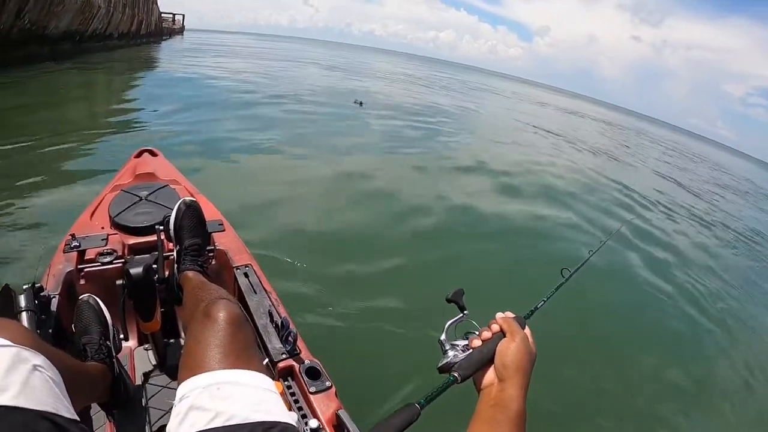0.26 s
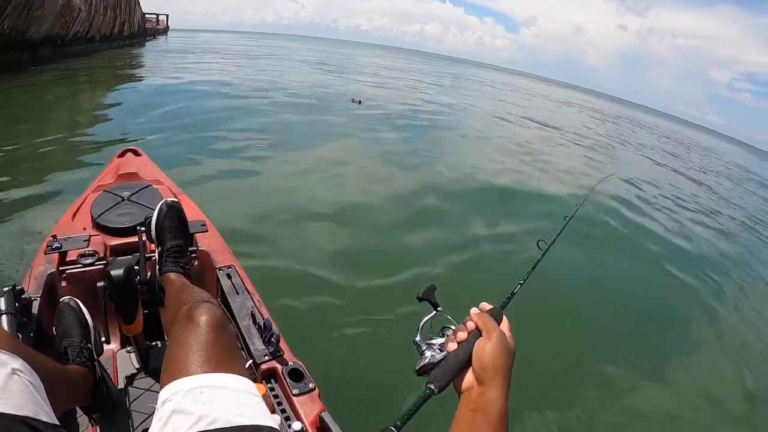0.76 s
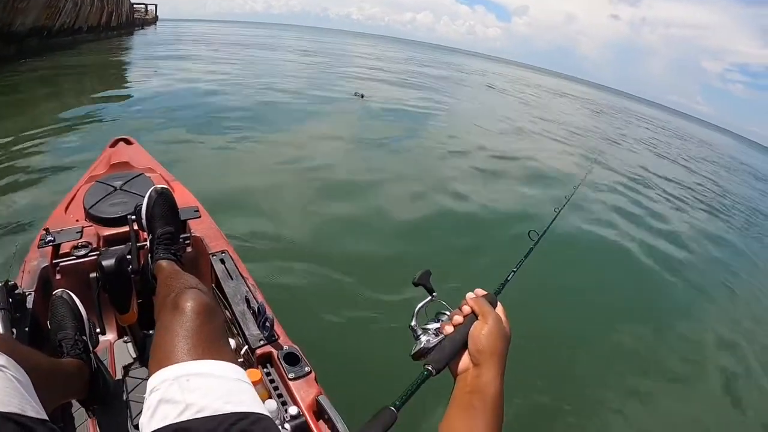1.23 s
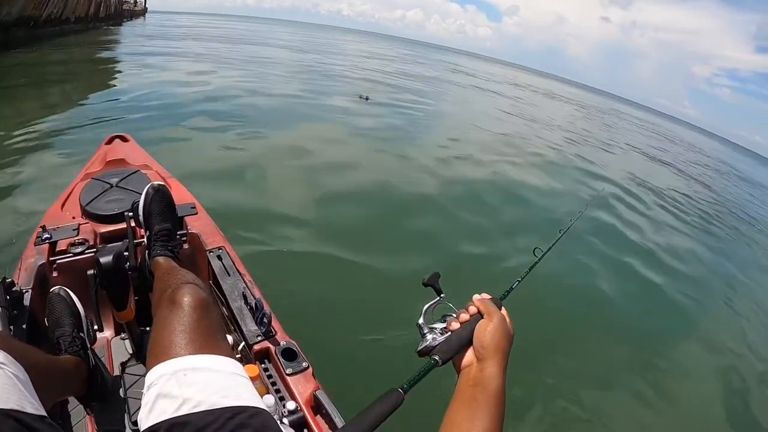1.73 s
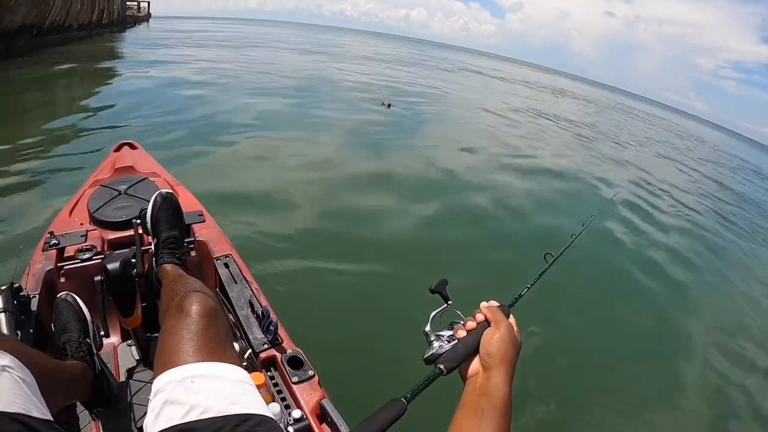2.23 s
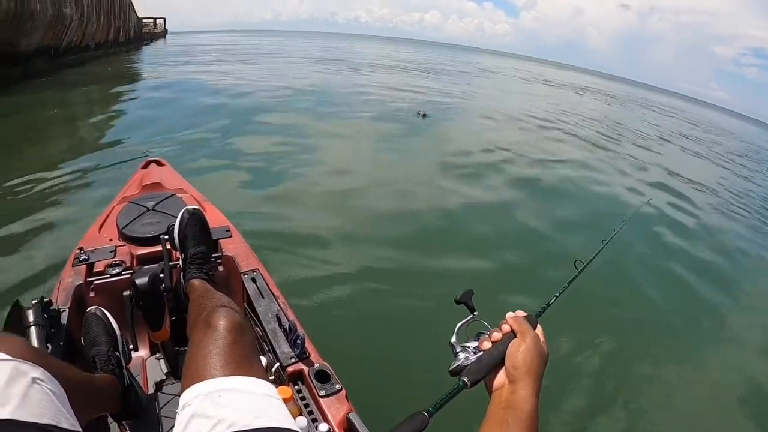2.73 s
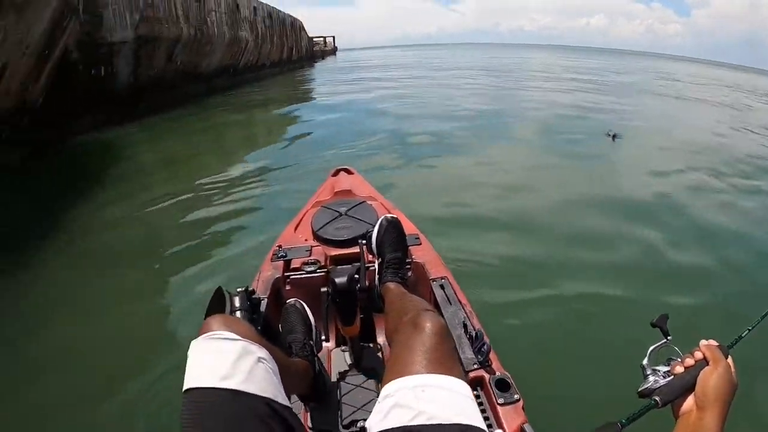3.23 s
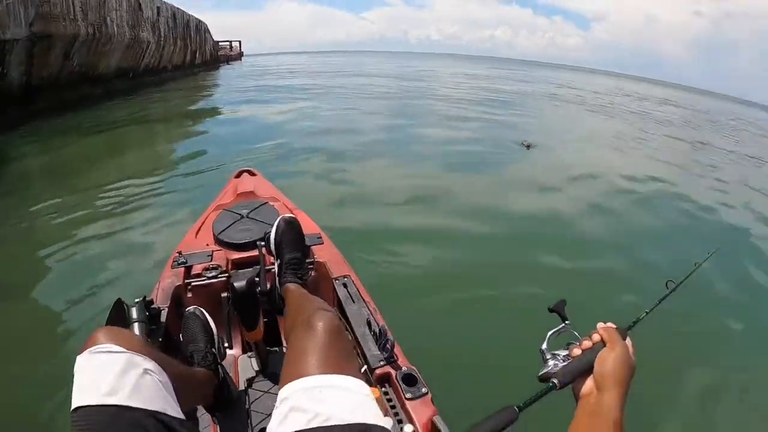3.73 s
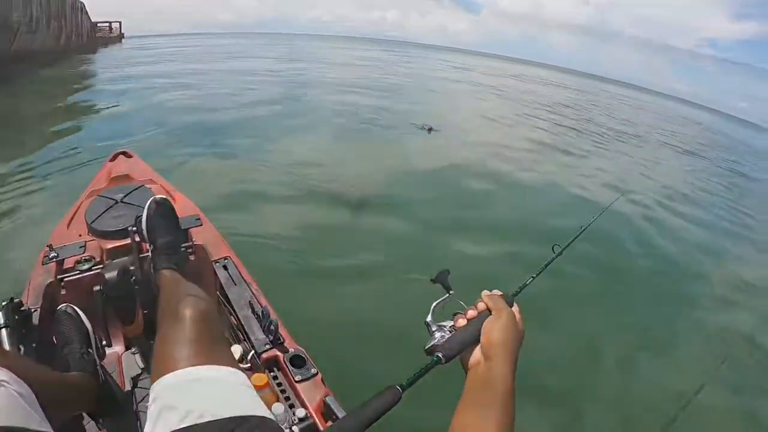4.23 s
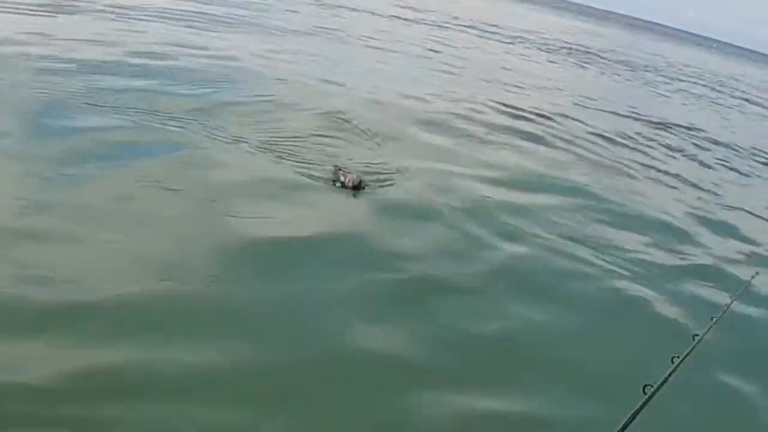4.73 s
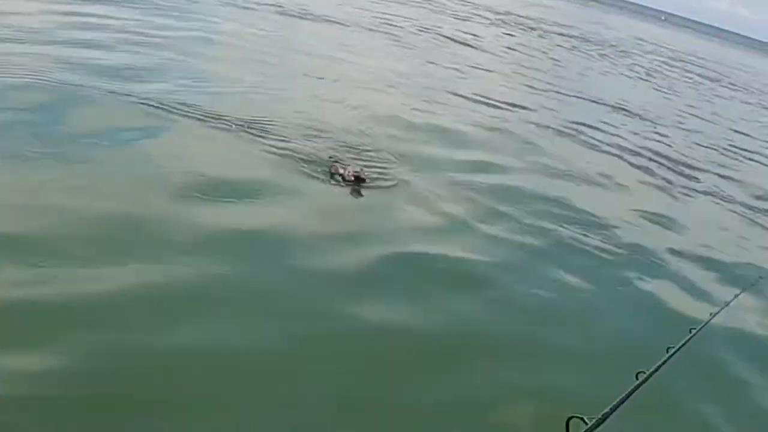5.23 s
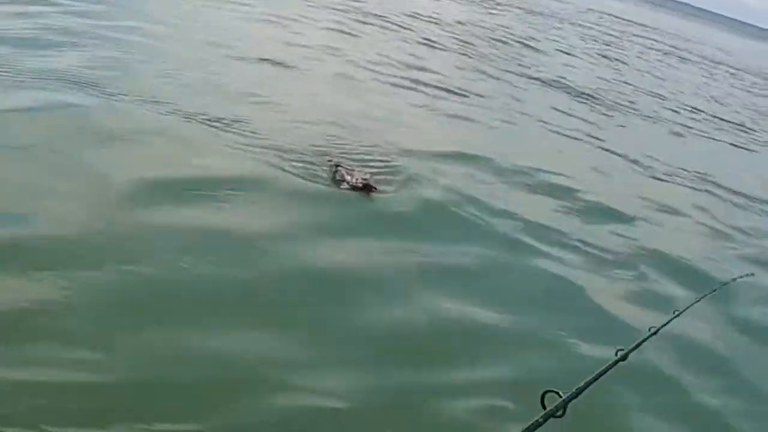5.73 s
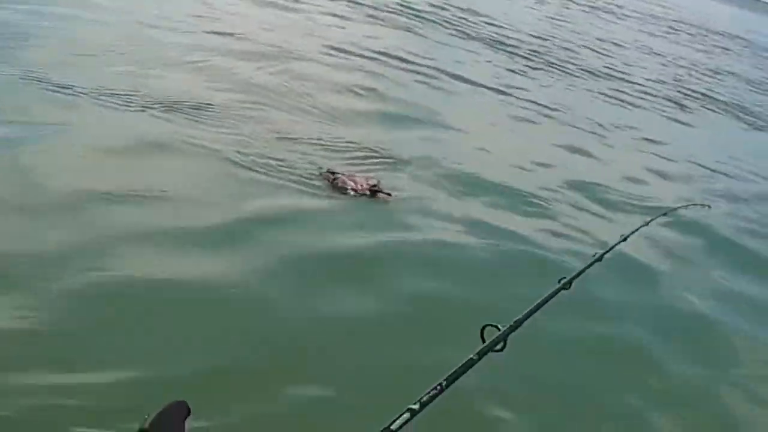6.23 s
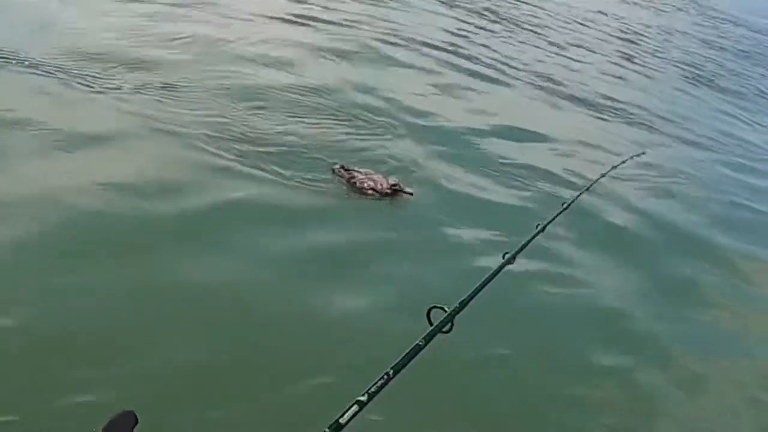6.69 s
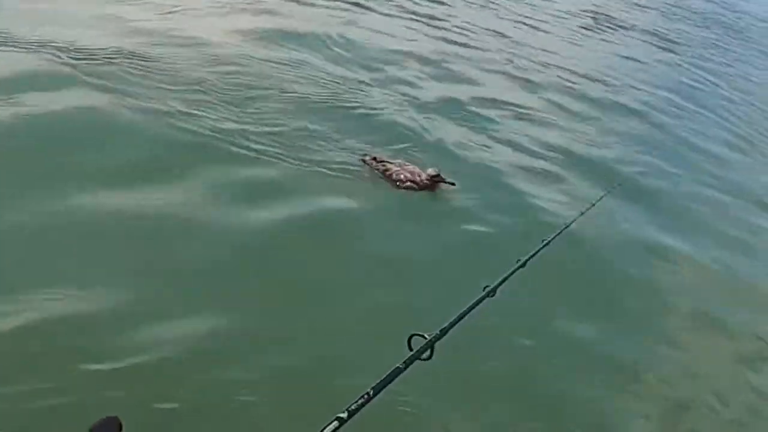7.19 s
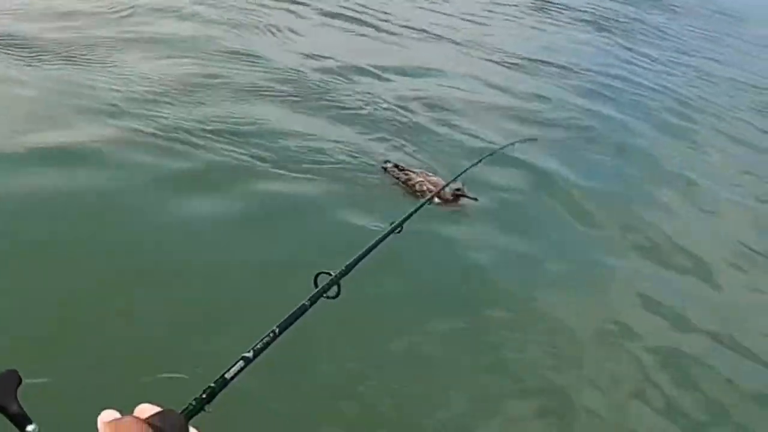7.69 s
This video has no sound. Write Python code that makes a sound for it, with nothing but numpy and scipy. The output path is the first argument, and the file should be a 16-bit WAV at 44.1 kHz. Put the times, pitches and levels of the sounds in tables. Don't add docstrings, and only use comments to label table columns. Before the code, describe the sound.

On a drifting plastic kayak by a sea wall, wind slaps the microphone while a chick peeps three times and the hull taps lightly. A nearby gull then gives paired hoarse yaps and three separate cries, each starting rough and high before sliding down into a growl. Distant gulls trill faintly, a low engine-like drone grows, and a hard gust bumps the end.

```python
import sys
import numpy as np
from scipy import signal
from scipy.fft import rfft, irfft, next_fast_len
from scipy.io import wavfile
from scipy.ndimage import uniform_filter1d, map_coordinates

SR = 44100
rng = np.random.default_rng(int(sys.argv[2]) if len(sys.argv) > 2 else 0)


def ratio(d):
    e = np.asarray(d, float) / 20
    return 10 ** e


def master_out(mix):
    frames = np.transpose(np.atleast_2d(mix))
    ceiling = np.clip(frames, -1, 1)
    pcm = np.round(ceiling * 32767).astype(np.int16)
    wavfile.write(sys.argv[1], SR, pcm)


N = 350696
PORTS = np.array([[0.5], [-0.5]])


def unit(x):
    return x / np.sqrt(np.mean(x ** 2) + 1e-20)


def along(points, hz):
    f, v = np.transpose(points)
    return np.interp(np.log(hz + 1), np.log(f + 1), v)


def curves(rows, t):
    s, *columns = np.transpose(rows)
    return [np.interp(t, s, column) for column in columns]


def wobble(rate, size=N):
    knots = rng.standard_normal(int(size * rate / SR) + 4)
    return map_coordinates(knots, [np.arange(size) * rate / SR])


def filtered(x, response):
    m = next_fast_len(x.shape[-1] + 8192)
    return irfft(rfft(x, m) * response(np.fft.rfftfreq(m, 1 / SR)), m)[..., :x.shape[-1]]


def above(hz):
    return lambda f: 1 / (1 + (hz / (f + 1)) ** 8)


def turned(pair, angles):
    return filtered(pair, lambda f: np.exp(1j * along(angles, f) * PORTS))


def add(track, s, sound):
    part = track[round(s * SR):][:len(sound)]
    part += sound[:len(part)]


def stack(hz, tones_db):
    turn = 2 * np.pi * np.cumsum(hz) / SR
    return np.sqrt(2) * sum(ratio(db) * np.sin((k + 1) * turn) for k, db in enumerate(tones_db))


def rush(spectrum, alike, patchy_db):
    z = signal.stft(rng.standard_normal((2, N)), nperseg=512)[2]
    field = uniform_filter1d(rng.standard_normal(z.shape[1:]), 5, axis=0)
    field = uniform_filter1d(field, 12, axis=1)
    pair = signal.istft(z * ratio(patchy_db * unit(field)), nperseg=512)[1][:, :N]
    mid, side = filtered(pair, lambda hz: ratio(along(spectrum, hz)))
    turn = np.arccos(np.clip(alike, 0, 1)) / 2
    mid, side = np.cos(turn) * mid, np.sin(turn) * side
    return unit(np.array([mid + side, mid - side]))


def puffs(rows, rise_db_s, fall_db_s):
    t = np.arange(N) / SR
    gain = 0
    for s, db, lean_db in rows:
        away_db = np.maximum(rise_db_s * (s - t), fall_db_s * (t - s))
        gain = gain + ratio(db + lean_db * PORTS - away_db)
    return gain


def wind():
    # time in seconds, breeze in dB
    breeze_rows = [(0, -38.5), (.6, -39.5), (1.3, -39.5), (1.8, -49.5), (2.5, -41), (2.75, -49),
                   (3.3, -46.5), (3.7, -41.5), (3.95, -29), (4.35, -33.5), (4.52, -51), (5.4, -36),
                   (5.85, -38), (6.4, -46), (6.75, -43), (7.1, -42.5), (7.5, -37.5), (7.95, -30.5)]
    # time in seconds, peak in dB, left minus right in dB
    puff_rows = [(.42, -24, -12.5), (.51, -36, -8), (1.35, -37.5, 12), (1.92, -36.5, 10.5), (2.3, -41, 0.5),
                 (2.41, -39, 12.5), (3.06, -39, -2.5), (3.48, -40, 6.5), (3.78, -31.5, 5),
                 (4.12, -23.5, 13.5), (5.93, -35.5, 14), (6.55, -31, 2), (7.2, -38.5, -2.5),
                 (7.37, -31.5, -8), (7.59, -20.5, -5), (7.84, -33.5, -24)]
    # time in seconds, peak in dB, left minus right in dB
    gust_rows = [
        (.006, -20.5, 5),
        (.418, -24, -17),
        (.496, -23.5, -25),
        (4.104, -39, 5),
        (7.538, -26, -7.5),
        (7.565, -11.5, 1),
    ]
    # frequency in Hz, density in dB per Hz
    buffet_spectrum = [(8.8, -34), (15, -1.5), (37, 8), (95, -1), (164, -20), (236, -28), (300, -32.5),
                       (390, -71), (660, -120)]
    flutter_spectrum = [(53, -32.5), (90, 0), (156, 6.5), (236, -6.5), (367, -18.5), (505, -24), (900, -74),
                        (1170, -91), (1980, -120)]
    breeze_lean_db = 5.5
    breeze_db, = curves(breeze_rows, np.arange(N) / SR)
    push = ratio(breeze_db + breeze_lean_db * PORTS) + puffs(puff_rows, rise_db_s=151, fall_db_s=146)
    lumps = ratio(0.64 * np.array([wobble(40), wobble(18)]))
    buffet = ratio(3.5) * push * unit(lumps * rush(buffet_spectrum, 0.02, patchy_db=3.0))
    gusts = puffs(gust_rows, rise_db_s=511, fall_db_s=701)
    return buffet + ratio(0.5) * gusts * rush(flutter_spectrum, 0.3, patchy_db=1.0)


def ship_drone():
    # time in seconds, level in dB
    approach = [(0, -49), (.93, -42), (1.57, -37.5), (2.45, -46), (3.2, -40.5), (4.2, -40), (4.5, -36),
                (5.3, -38.5), (7.95, -34)]
    # frequency in Hz, density in dB per Hz
    spectrum = [(53, -46.5), (90, -3), (182, 1.5), (225, -3.5), (258, -13.5), (285, -13), (364, -24),
                (392, -21.5), (800, -72), (1040, -86), (1760, -120)]
    # frequency in Hz, lead of the left port in radians
    angles = [(100, .3), (200, .8), (350, 1.4)]
    level_db, = curves(approach, np.arange(N) / SR)
    level_db = level_db + 1.5 + 0.3 * wobble(35) + 0.21 * wobble(3.3)
    return ratio(level_db) * turned(rush(spectrum, 1.0, patchy_db=1.0), angles)


def murmur_and_wash():
    # time in seconds, stir in dB
    bustle = [(0, -57.5), (.25, -70), (.93, -75), (1.2, -69), (2.5, -65.5), (3.2, -70), (3.67, -63),
              (4.18, -69.5), (4.47, -68), (4.7, -67.5), (5.3, -70.5), (6.3, -64.5), (6.64, -69.5),
              (7.95, -67)]
    # frequency in Hz, density in dB per Hz
    murmur_spectrum = [(1300, -38), (1900, -12), (2950, -5), (3550, -7.5), (5300, -12.5), (6400, -20),
                       (7400, -26), (8300, -36.5), (16000, -68.5)]
    wash_spectrum = [(290, -2.5), (500, -3), (802, -11.5), (1200, -8), (1750, -9.5), (2400, -22.5),
                     (3120, -45.5), (5280, -120)]
    mean_wash_db, follows = -60, 0.9
    stir_db, = curves(bustle, np.arange(N) / SR)
    murmur = ratio(stir_db + np.array([[4], [-1.5]])) * rush(murmur_spectrum, 0.4, patchy_db=3.3)
    wash_db = mean_wash_db + follows * (stir_db - stir_db.mean()) + 0.5 * wobble(6.3)
    return murmur + ratio(wash_db) * rush(wash_spectrum, 0.29, patchy_db=5.5)


def taps():
    # time in seconds, peak in dB, frequency in Hz
    hull_knocks = [(0.439, -58, 996), (0.4773, -46, 1360), (0.632, -54.5, 1610), (0.839, -59.5, 1700),
                   (2.911, -65, 1080), (2.96, -49, 510), (4.2182, -50, 1054)]
    dull_thuds = [
        (0.057, -41, 460),
        (2.7, -44, 417),
        (4.22, -45, 530),
    ]
    drips = [(0.4057, -69, 4740), (0.4761, -49.5, 4530), (0.7342, -51.5, 5100), (0.817, -55.5, 4540),
             (1.3272, -49, 4800), (2.2323, -36, 4230), (2.9812, -48, 5000), (3.255, -53, 4970),
             (3.5633, -55, 5310), (4.148, -51, 4800), (5.3946, -72, 4360), (5.5288, -47, 4600)]
    cloth = [(0.0014, -84, 8030), (0.1161, -74, 9240), (0.396, -72.5, 8000), (0.4044, -68, 8000),
             (0.4144, -79, 8000), (0.4199, -69, 8140), (0.4489, -69.5, 9670), (0.4894, -73, 8010),
             (4.0682, -76.5, 9390), (4.0954, -64, 8100), (4.1849, -79, 8000)]
    slaps = [
        (4.088, -4.5, 121),
        (7.576, 0, 231),
    ]
    # rows, decay by 60 dB in seconds, ring share, crack share, rise in seconds
    kinds = ((hull_knocks, 0.03, 0.9, 0.3, 0.0015),
             (dull_thuds, 0.05, 0.9, 0.2, 0.0015),
             (drips, 0.016, 0.1, 0.45, 0.0015),
             (cloth, 0.02, 0, 0.8, 0.001),
             (slaps, 0.035, 0.9, 0, 0.005))
    out, t = np.zeros(N), np.arange(2500) / SR
    for rows, t60, ring, crack, rise_s in kinds:
        rise = (1 - np.exp(-(t / rise_s) ** 1.9)) ** 2
        for s, db, hz in rows:
            band = lambda f: (f * hz / (hz * hz - f * f + 0.6j * f * hz)) ** 3
            grit = unit(filtered(rng.standard_normal(len(t)), band))
            body = ring * np.sin(2 * np.pi * hz * t) + crack * grit
            add(out, max(0, s - 0.001), ratio(db + 8.0 - 60 * t / t60) * rise * body)
    return out * ratio([[1], [-1]])


def colony():
    # start in seconds, length in seconds, pitch in Hz, final fall share, level in dB
    light_trills = [(0.232, 0.48, 1720, .03, -67.5), (1.327, 0.11, 1800, 0.11, -63.5),
                    (2.02, 0.094, 1680, 0.014, -60.5), (2.995, 0.25, 1750, 0.043, -67.5),
                    (3.701, 0.14, 1823, 0.094, -59), (3.844, 0.12, 1385, 0.12, -59.5),
                    (4.618, 0.095, 1816, 0.082, -60), (4.991, 0.077, 1600, 0.012, -65.5),
                    (5.049, 0.45, 1517, 0.29, -69), (5.688, 0.12, 1772, 0.028, -58),
                    (6.626, 0.19, 1810, 0.09, -60), (7.0, 0.1, 1560, 0.19, -78),
                    (7.717, 0.1, 1670, 0.14, -67)]
    bright_calls = [(0.951, 0.067, 1730, 0.012, -68), (1.077, 0.27, 1760, 0.061, -66.5),
                    (2.7, 0.47, 1690, 0.01, -69), (4.126, 0.11, 1703, 0.016, -62),
                    (7.567, 0.1, 1790, 0.062, -55.5)]
    chatter = [(1.484, .4, 1697, 0.11, -61), (6.808, 0.19, 1320, 0.19, -61.5),
               (7.197, 0.1, 1647, 0.16, -64.5), (7.273, 0.14, 1435, 0.12, -56),
               (7.393, 0.11, 1354, 0.025, -61)]
    # overtones 1-4 in dB, trill depth 0-1, beats a second, slide share
    kinds = [
        ([-10, -2, -8, -21], .6, 33, .004),
        ([-9, -8, -2, -13], .45, 33, .004),
        ([-11, -1, -7, -14], .9, 40, .03),
    ]
    named = [(*row, *kind) for rows, kind in zip((light_trills, bright_calls, chatter), kinds) for row in rows]
    crowd = [(7.8 * a, 0.08 + 0.2 * b, 1250 + 700 * c, 0.25 * d, -79 + 6 * e, *kinds[0])
             for a, b, c, d, e in rng.random((40, 5))]
    out = np.zeros((2, N))
    for s, length, hz, fall, db, tones_db, trill, rate, slide in named + crowd:
        t = np.arange(0, length, 1 / SR)
        u = t / length
        turn = 2 * np.pi * rate * t + 0.53 * wobble(4.1, size=len(t))
        beat = np.cos(turn)
        bend = -0.05 * (1 - u) ** 6 - fall * u ** 2.5
        shake = 0.012 * beat - slide * np.sin(turn) + 0.006 * wobble(40, size=len(t))
        hoarse = 1 + 0.25 * wobble(200, size=len(t))
        chop_db = 14 * trill * ((1 - beat) / 2) ** 3
        level = ratio(db + 2 * wobble(25, size=len(t)) - chop_db) * np.sin(np.pi * u) ** 0.35
        tone = level * hoarse * stack(hz * (1 + bend + shake), tones_db)
        add(out[0], s, ratio(-0.5) * tone)
        add(out[1], s + 0.00006 * rng.random(), ratio(-4.5) * tone)
    t = np.arange(SR // 3) / SR
    smear = rng.standard_normal((2, len(t))) * ratio(-60 * t / 0.35)
    smear /= np.linalg.norm(smear[0])
    return out + ratio(-9) * signal.fftconvolve(out, smear, axes=1)[:, :N]


def chick():
    # start in seconds, length in seconds, first pitch in Hz, last pitch in Hz, level in dB
    peeps = [
        (0, 0.09, 3080, 2850, -49.5),
        (0.091, 0.063, 2720, 2720, -53),
        (0.164, 0.051, 2680, 2640, -51.5),
        (2.958, 0.072, 2050, 1403, -60.5),
        (7.001, 0.028, 3090, 2640, -63.5),
        (7.499, 0.024, 2810, 2460, -57.5),
    ]
    arch, arch_at, arch_width = 0.15, 0.53, 0.22
    out = np.zeros(N)
    for s, length, first_hz, last_hz, db in peeps:
        u = np.linspace(0, 1, round(length * SR))
        bulge = np.exp(-np.abs((u - arch_at) / arch_width) ** 0.92)
        hz = (first_hz + u * (last_hz - first_hz)) * (1 + arch * bulge)
        hoarse = 1 + 0.41 * wobble(400, size=len(u))
        level = ratio(db - 9.3 * (1.0 - bulge)) * np.sin(np.pi * u) ** 0.5
        add(out, s, level * hoarse * stack(hz, [-9, 0, -33]))
    return out


def rasp(size, rate_hz, scatter, breath, hiss_db, rise=0, sink=0):
    # frequency in Hz, width in Hz, level in dB
    resonances = [(1050, 450, -9), (1550, 420, 0), (2300, 600, -16)]

    def throat(f):
        return sum((-1) ** k * ratio(db) * 1j * f * w / (c * c - f * f + 1j * f * w)
                   for k, (c, w, db) in enumerate(resonances))

    count = np.cumsum(rate_hz * (1 + scatter * wobble(300, size=size))) / SR
    pulses = np.diff(np.floor(count), prepend=0) * ratio(2.5 * rng.standard_normal(size))
    drive = unit(pulses) + breath * rng.standard_normal(size)
    tunings = lambda f: np.array([throat(f / 0.8), throat(f)]) ** 2 * above(600)(f)
    low, high = unit(filtered(drive, tunings))
    hiss = unit(filtered(drive, lambda f: (f * 3200 / (4700 ** 2 - f * f + 1j * f * 3200)) ** 3))
    clock = np.arange(size) / SR
    opening = np.clip(1 - rise + clock / 0.036, 0, 1)
    closing = np.clip(1 - sink + clock[::-1] / 0.067, 0, 1)
    share = opening * closing
    return (1 - share) * low + share * high + ratio(hiss_db) * hiss


def yaps():
    # start in seconds, rasp in seconds, pitch in Hz, level in dB, half-pitch share 0-1
    yap_rows = [(0.97, .034, 1010, -30.5, 0.2), (1.196, 0.033, 966, -29.5, 0.3),
                (1.931, 0.034, 1041, -26, 0.3), (2.133, 0.028, 1015, -28.5, 0.83),
                (3.441, 0.037, 1058, -27, 0.38), (3.626, .03, 1033, -27, 0.3),
                (4.586, 0.032, 1054, -28, 0.5), (4.785, 0.026, 1023, -31.5, 0.6),
                (6.356, 0.032, 1003, -28.5, 0.5), (6.548, 0.03, 982, -32.5, 0.15),
                (7.881, .034, 1001, -29, 0.3)]
    tones_db = [-5, 0.5, -21.5, -19, -36, -45, -50.5]
    half_tones_db = [-25.5, -69.5, 3.5, -69.5, -14, -67.5, -32.5]
    yap_s, tail_s = 0.066, 0.024
    out = np.zeros(N)
    for s, lead, hz, db, half in yap_rows:
        t = np.arange(0, yap_s + tail_s, 1 / SR)
        u = (t - lead) / (yap_s - lead)
        pitch = hz * (1 - 0.15 * (u - 0.25) ** 2) * (1 + 0.004 * wobble(120, size=len(t)))
        tone = stack(pitch, tones_db) + half * stack(pitch / 2, half_tones_db)
        note_db = np.interp(u, [-0.3, 0.05, 0.5, 1.05, 1.35], [-40, -1, 0, -7, -40])
        rough_s = [0, 0.01, lead - 0.004, lead + 0.008, yap_s + 0.002, t[-1] - 0.008, t[-1] - 0.004, t[-1]]
        rough_db = np.interp(t, rough_s, [-34, -15, -2, -22, -22, -13, -16, -36])
        rough = rasp(len(t), 250 + 900 * t, scatter=0.12, breath=0.51, hiss_db=-34.0, rise=1.06, sink=0.13)
        add(out, s, ratio(db - 8.5 + note_db) * tone + ratio(db + 1.5 + rough_db) * rough)
    return filtered(out, lambda f: 1 / (1 + (f / 6500) ** 6))


def runups():
    # start in seconds, length in seconds, pulse rate in Hz, level in dB
    runup_rows = [
        (2.415, 0.042, 463.7, -29),
        (4.279, 0.051, 502, -33.5),
        (6.128, 0.047, 501, -30.5),
    ]
    out = np.zeros(N)
    for s, length, hz, db in runup_rows:
        u = np.linspace(0, 1, round(length * SR))
        pitch = hz * (0.9 + 0.15 * u)
        voice = rasp(len(u), pitch, scatter=0.06, breath=0.7, hiss_db=-18, rise=1)
        voice = voice + u * stack(pitch, [-10, -7, -2, -8])
        fade = np.minimum(1, 14 * u) * np.minimum(1, 9 * (1 - u))
        add(out, s, ratio(db - 11 * (1 - u)) * fade * voice)
    return out


def sung_note(out, rows, over, open_db, harsh):
    # frequency in Hz, level in dB under the fundamental
    beak_tones = [(1500, -9), (3000, -19.5), (4600, -17.5), (6200, -24), (7200, -40.5), (9000, -39),
                  (12000, -49.5), (15500, -64.5)]
    attack_s, attack_db, release_s, release_db = 0.009, 18.5, 0.021, 35.5
    beak_hz, beak_level_db, beak_db_per_oct = 1596, -22.5, 27.5
    shut_hz, shut_db_per_hz = 900, 6
    beak_tilt, harsh_dulls_db = 0.0049, 5
    patchy_db = 3
    break_hz, break_span_hz, growl_top, attack_growl = 935.4, 50.3, 0.74, 0.81
    growl_takes = 0.5
    crack_s, crack_db = 0.014, -12

    first_s, last_s = rows[0][0], rows[-1][0]
    t = np.arange(first_s - attack_s, last_s + release_s, 1 / SR)
    size = len(t)
    early = np.clip((first_s - t) / attack_s, 0, 1)
    late = np.clip((t - last_s) / release_s, 0, 1)
    hz, db = curves(rows, t)
    growl = np.maximum(attack_growl * early, np.clip((break_hz - hz) / break_span_hz, 0, growl_top))
    hz = uniform_filter1d(hz * (1 + over * early), 300, mode="nearest") * (1 + 0.002 * wobble(90, size=size))

    sink_db = beak_db_per_oct * np.log2(hz / beak_hz)
    shut_db = shut_db_per_hz * np.maximum(0, shut_hz - hz)
    beak_db = np.minimum(0, beak_level_db + open_db + sink_db - shut_db - db)
    tilt_db = beak_tilt * sink_db - harsh_dulls_db * harsh
    over_db = [along(beak_tones, k * hz) + beak_db + patchy_db * wobble(45, size=size) + (k - 4) * tilt_db
               for k in range(2, 16)]
    tone = stack(hz, [0]) + (1 + harsh * wobble(900, size=size)) * stack(hz, [-120] + over_db)

    thirds = stack(hz / 3, [-60.5, -17.5, -59.5, -4, -14, -6, -26]) * (1 + 0.24 * wobble(150, size=size))
    hoarse = 0.15 * rasp(size, hz / 3, scatter=0.056, breath=0.58, hiss_db=-20.0, rise=0.38)
    clear = (1 - np.clip(growl_takes * growl, 0, 1)) * tone
    broken = np.clip(growl, 0, 1) ** 2 * (thirds + hoarse)
    add(out, t[0], ratio(db - attack_db * early - release_db * late) * (clear + broken))
    crack = rasp(round(crack_s * SR), 500, scatter=0.2, breath=1.1, hiss_db=-10.5)
    add(out, first_s - 0.77 * crack_s, ratio(rows[0][2] + crack_db) * np.hanning(len(crack)) * crack)


def cries():
    # time in seconds, pitch in Hz, level in dB
    cry_tables = [
        [(2.486, 1551, -13.5), (2.514, 1526, -23.5), (2.54, 1464, -24.5), (2.574, 1360, -25),
         (2.612, 1191, -31), (2.638, 1005, -33), (2.664, 902.4, -28.5), (2.672, 860, -34), (2.735, 787, -44)],
        [(4.342, 1532, -25), (4.406, 1510, -27), (4.43, 1465, -28), (4.47, 1379, -25), (4.49, 1316, -26.5),
         (4.505, 1217, -23.5), (4.56, 1095, -33), (4.58, 946, -27.5), (4.64, 812, -41)],
        [(6.198, 1574, -16), (6.225, 1554, -23.5), (6.275, 1475, -30.5), (6.299, 1360, -27), (6.322, 1264, -21),
         (6.345, 1200, -28.5), (6.404, 1103, -34.5), (6.413, 926, -26.5), (6.47, 802.4, -42.5)],
    ]
    # start in seconds, length in seconds, pitch in Hz, level in dB
    grace_rows = [
        (2.453, 0.02, 1232, -18),
        (4.324, 0.0084, 1235, -18.5),
        (6.172, 0.015, 1280, -16),
    ]
    rise, hook, hook_at, swell_db = 0.035, 0.096, 0.72, 4
    out = np.zeros(N)
    for s, length, hz, db in grace_rows:
        rows = [(s, hz, db - swell_db),
                (s + hook_at * length, hz * (1 + rise), db),
                (s + length, hz * (1 + hook), db)]
        sung_note(out, rows, over=0, open_db=8.5, harsh=0.35)
    for rows in cry_tables:
        sung_note(out, rows, over=0.066, open_db=0, harsh=0.1)
    return filtered(out, above(480)) + runups()


def open_water(x):
    # time in seconds, birds left minus right in dB
    heading = [(0, 0), (1.2, 6.5), (2.2, 5.5), (2.6, 11.5), (3.5, 19), (4.4, 14), (4.8, 1.5), (6.2, 12),
               (6.6, 3), (7.95, 1.5)]
    # from seconds, left delay in ms, left level in dB,
    # right delay in ms, right level in dB
    bounces = [
        (0, 3.77, -6, 3.06, -4.5),
        (2.35, 3.76, -1.7, 3.06, -4),
        (3.2, 3.78, -2.5, 3.06, 2.5),
        (4.22, 3.79, -3.5, 3.06, -3),
        (5.5, 3.77, -1.3, 3, -15.5),
        (6.52, 3.8, -3.5, 3.06, -6.5),
    ]
    # frequency in Hz, lead of the left port in radians
    angles = [(600, 0.6), (1550, 0.62), (3000, 0.87), (6000, 1.8)]
    dull_hz = 1200
    wall_db, wall_t60_s = -19, 0.4
    lean_db, = curves(heading, np.arange(N) / SR)
    near = np.zeros((2, N))
    ends = [round(row[0] * SR) for row in bounces[1:]] + [N]
    for (s, left_ms, left_db, right_ms, right_db), end in zip(bounces, ends):
        ports = ((left_ms, left_db), (right_ms, right_db))
        path = lambda f: np.array([1 + ratio(db - f / dull_hz) * np.exp(-2j * np.pi * f * ms / 1000)
                                   for ms, db in ports])
        left, right = filtered(np.pad(x[round(s * SR):end], (0, 400)), path)
        add(near[0], s, left)
        add(near[1], s, right)
    t = np.arange(SR // 2) / SR
    tail = rng.standard_normal((2, len(t))) * ratio(-60 * t / wall_t60_s) * (t > 0.008)
    tail = filtered(tail, lambda f: 1 / (1 + (f / 3000) ** 2))
    wall = signal.fftconvolve(x[None], tail / np.linalg.norm(tail[0]), axes=1)[:, :N]
    level_db = np.array([5 + 0 * lean_db, 6.5 - lean_db])
    return turned(near, angles) * ratio(level_db) + ratio(wall_db) * wall


def scene():
    surroundings = wind() + ship_drone() + murmur_and_wash() + taps() + colony()
    return surroundings + open_water(chick() + yaps() + cries())


def top_cut(x):
    return signal.sosfilt(signal.butter(12, 15300, fs=SR, output="sos"), x)


def record(dry):
    held = dry / (1 + np.abs(dry / 0.93) ** 4) ** (1 / 4)
    return top_cut(held)


dry = scene()
out = record(dry)
master_out(out)
```